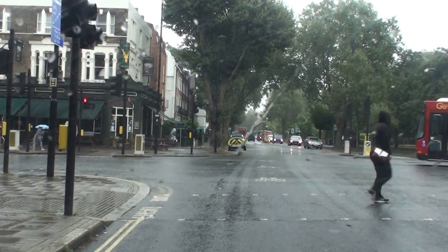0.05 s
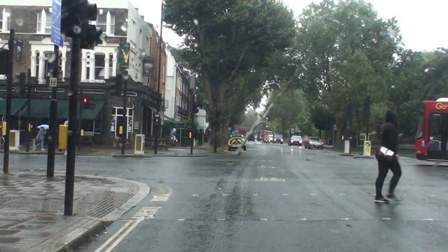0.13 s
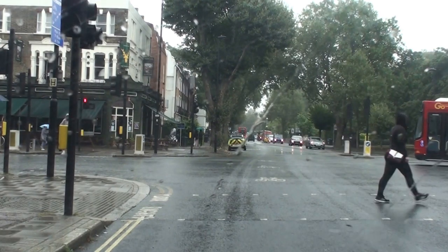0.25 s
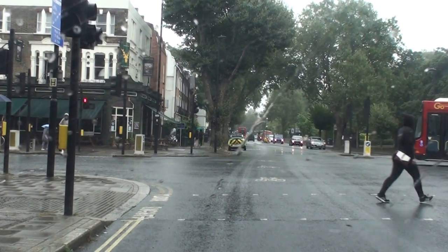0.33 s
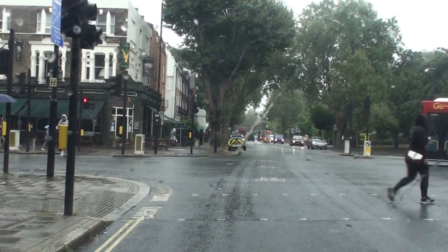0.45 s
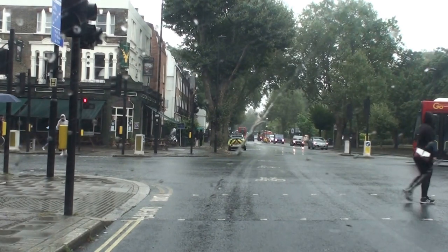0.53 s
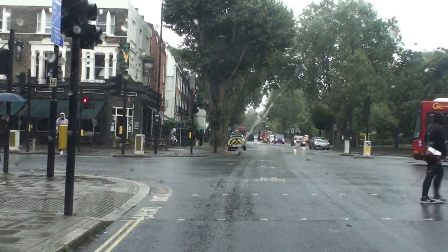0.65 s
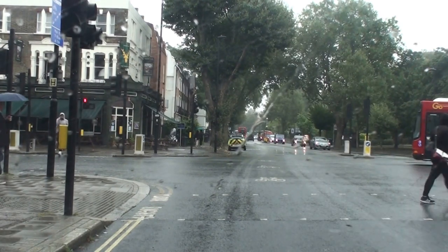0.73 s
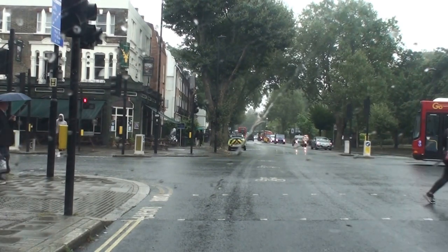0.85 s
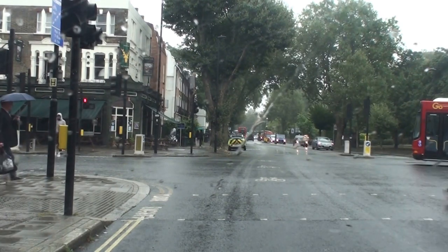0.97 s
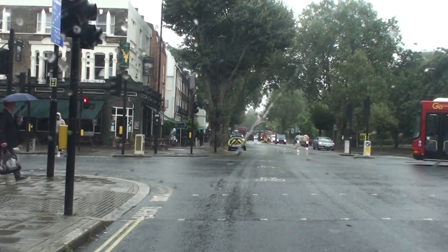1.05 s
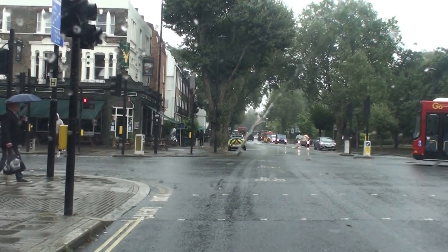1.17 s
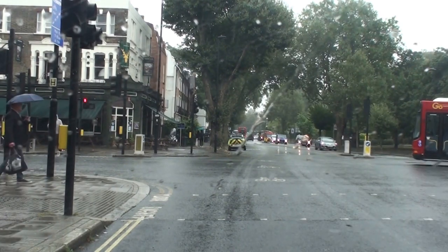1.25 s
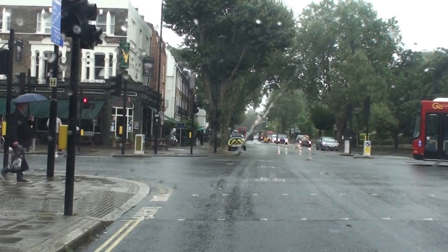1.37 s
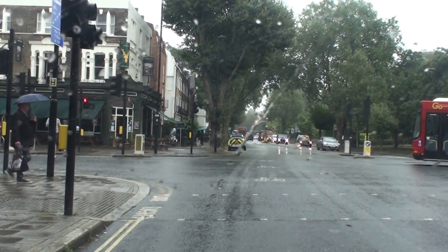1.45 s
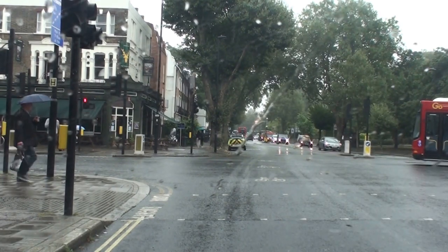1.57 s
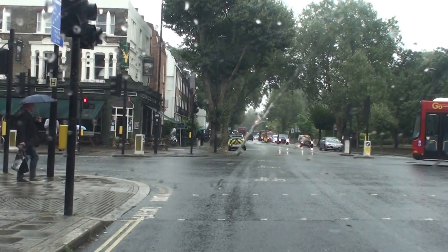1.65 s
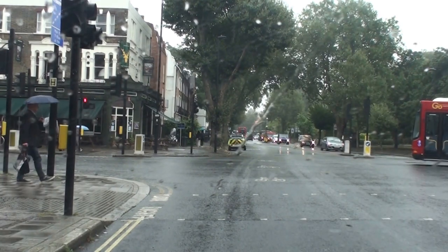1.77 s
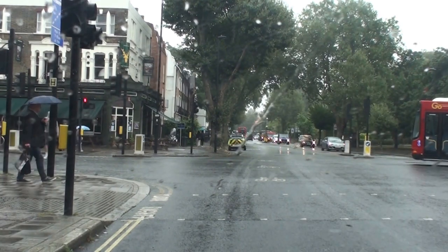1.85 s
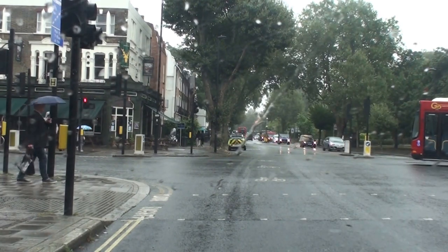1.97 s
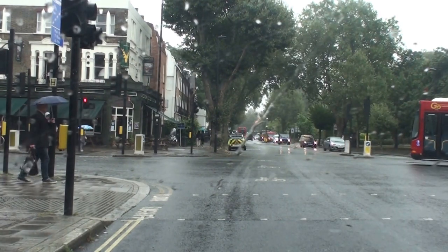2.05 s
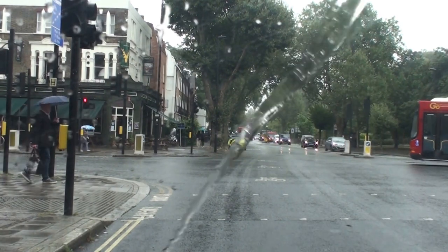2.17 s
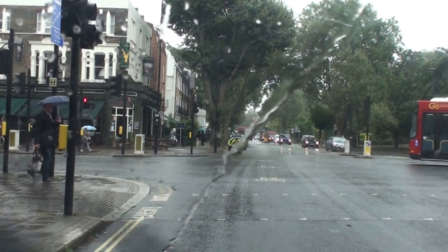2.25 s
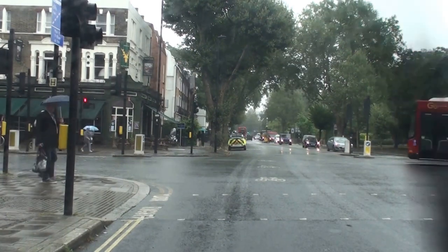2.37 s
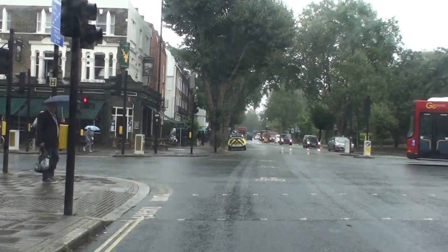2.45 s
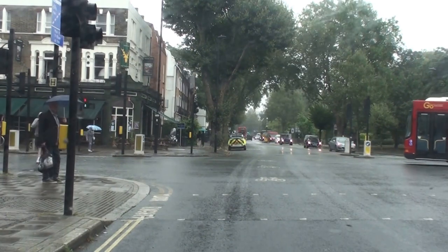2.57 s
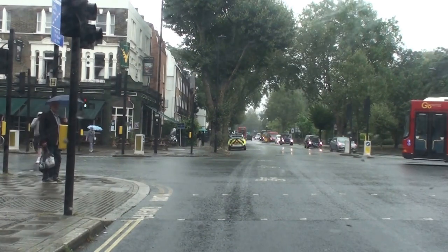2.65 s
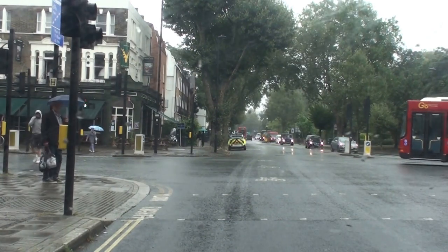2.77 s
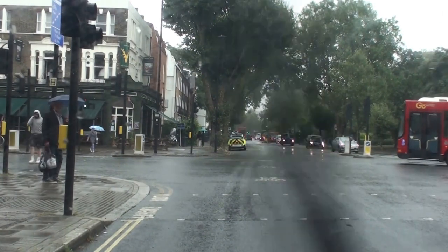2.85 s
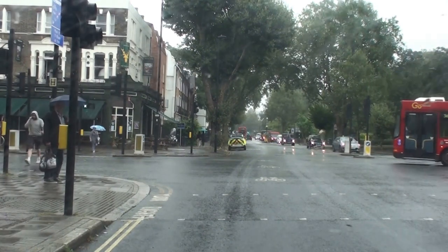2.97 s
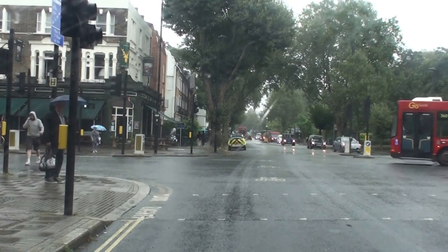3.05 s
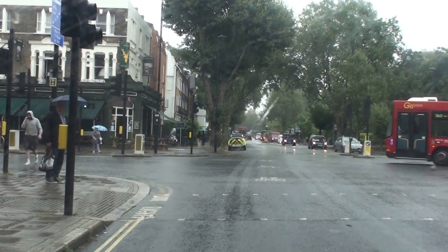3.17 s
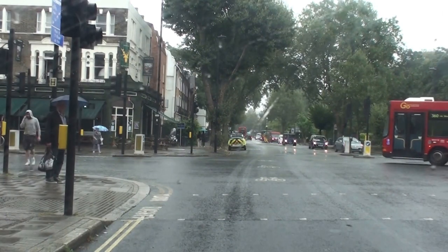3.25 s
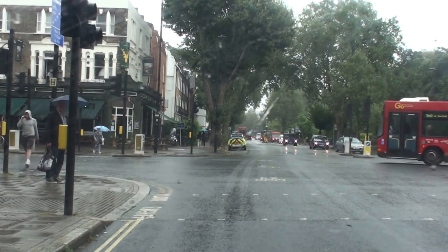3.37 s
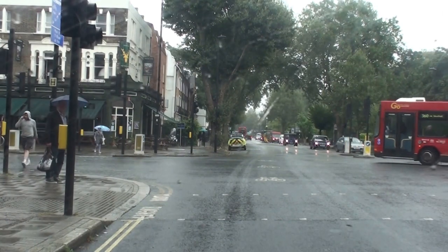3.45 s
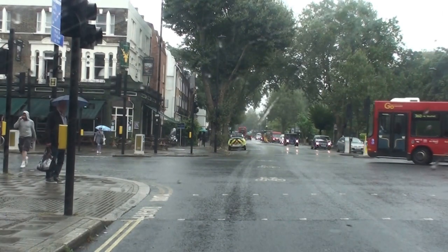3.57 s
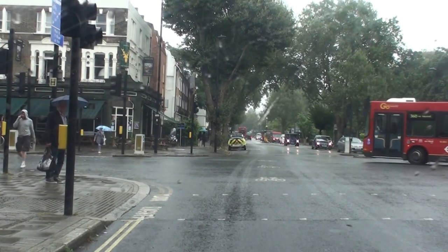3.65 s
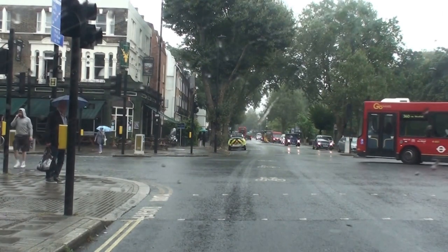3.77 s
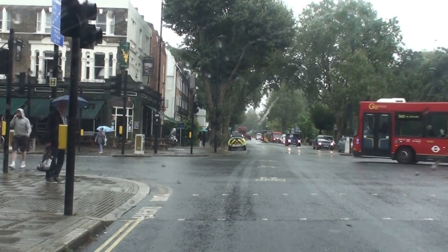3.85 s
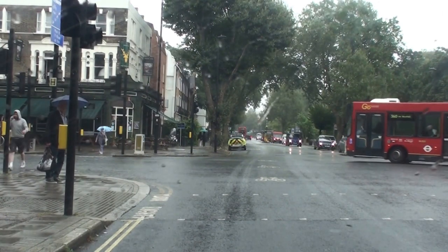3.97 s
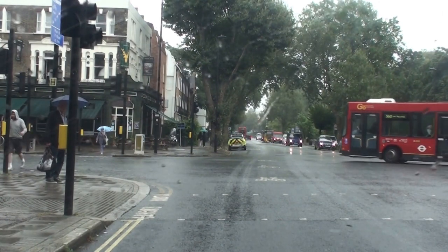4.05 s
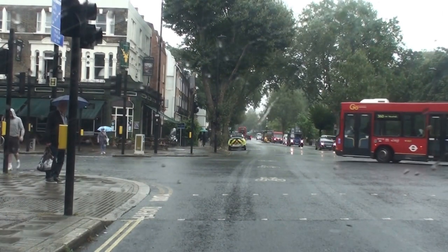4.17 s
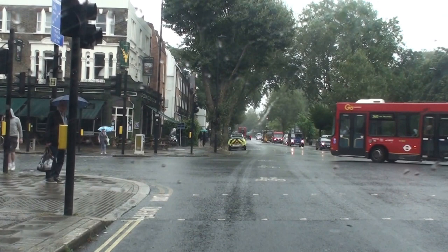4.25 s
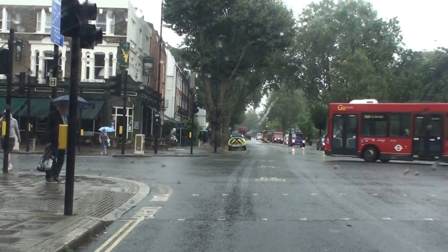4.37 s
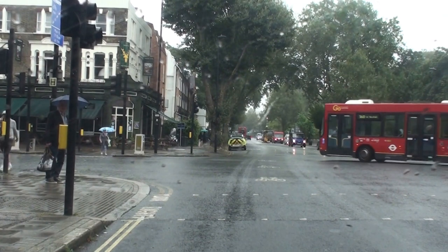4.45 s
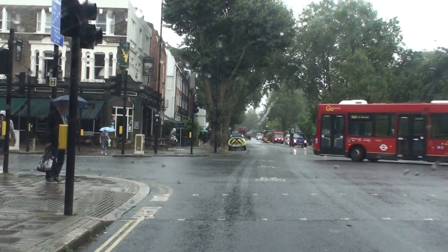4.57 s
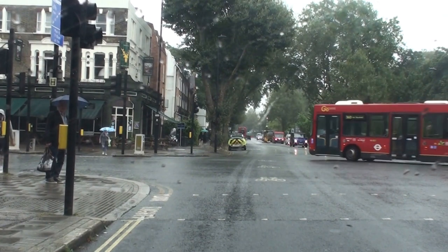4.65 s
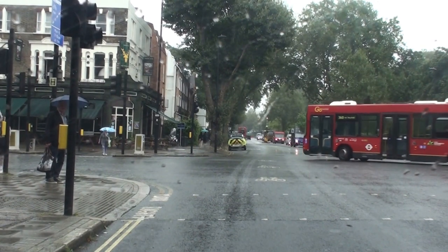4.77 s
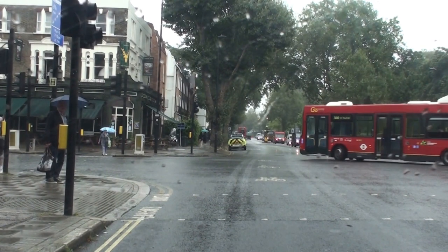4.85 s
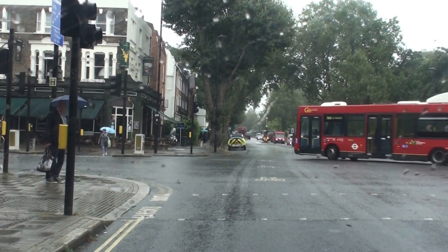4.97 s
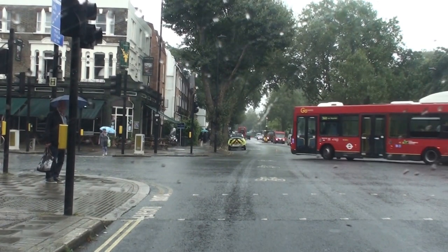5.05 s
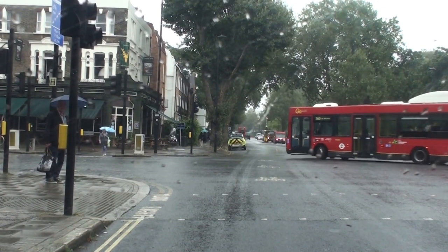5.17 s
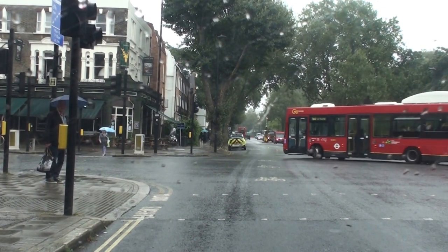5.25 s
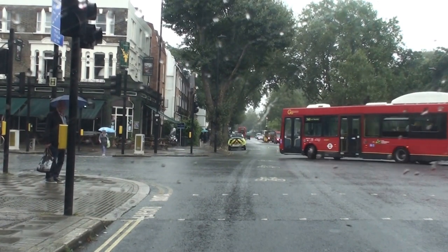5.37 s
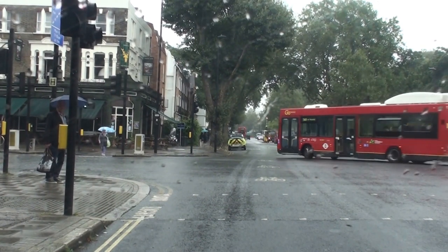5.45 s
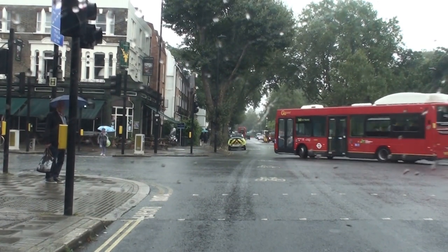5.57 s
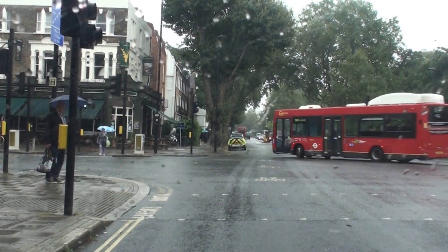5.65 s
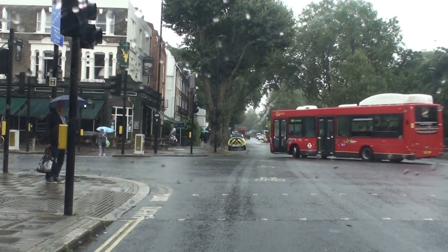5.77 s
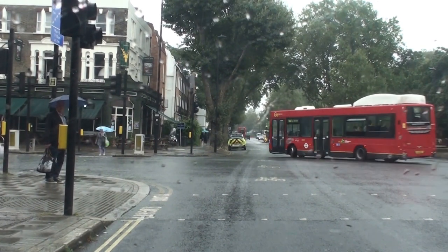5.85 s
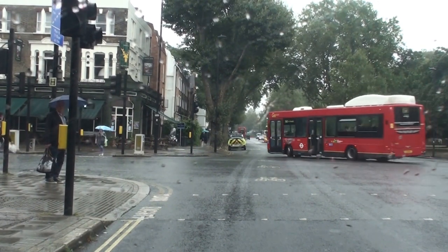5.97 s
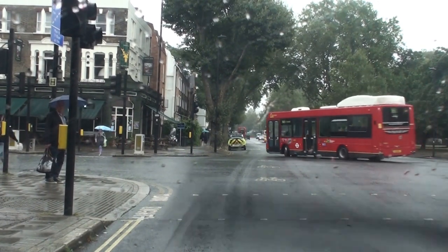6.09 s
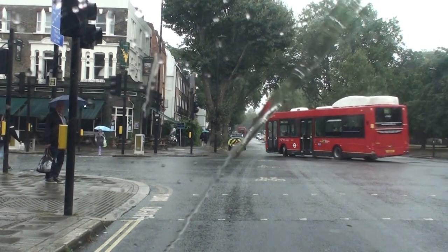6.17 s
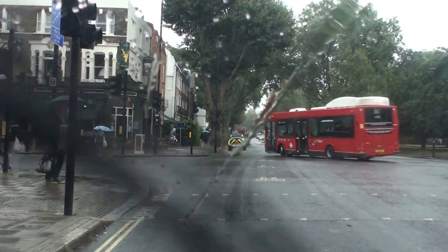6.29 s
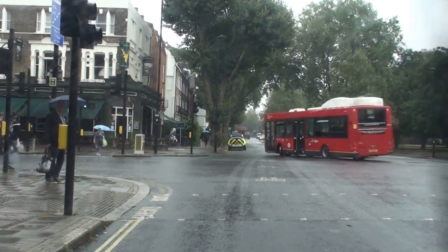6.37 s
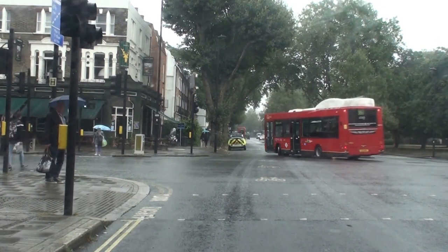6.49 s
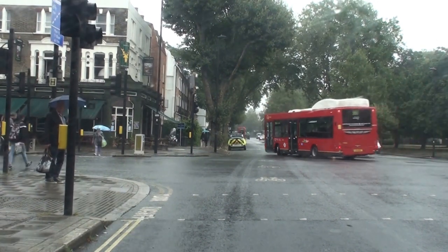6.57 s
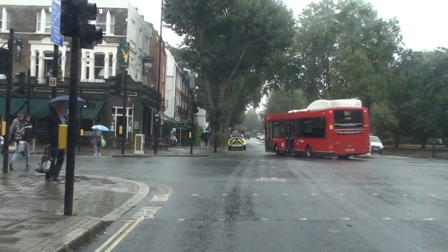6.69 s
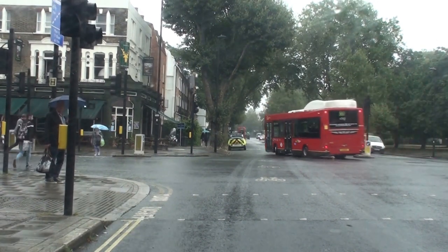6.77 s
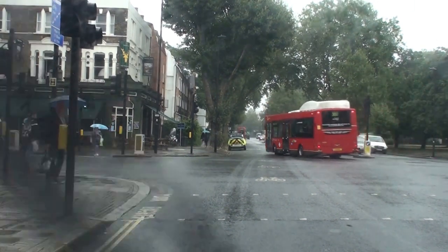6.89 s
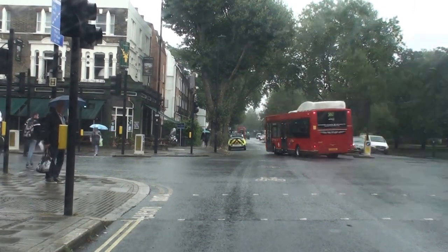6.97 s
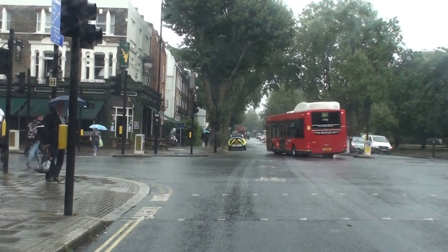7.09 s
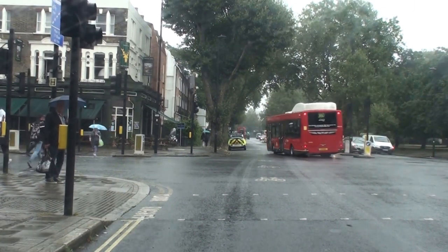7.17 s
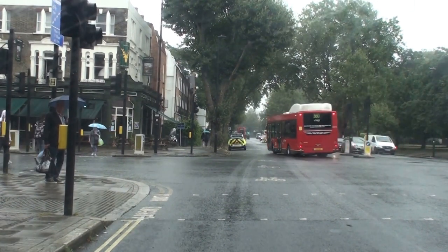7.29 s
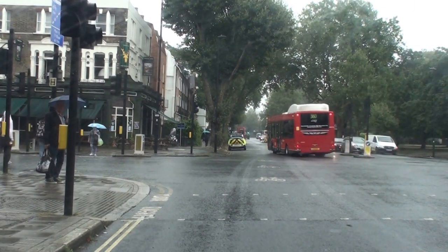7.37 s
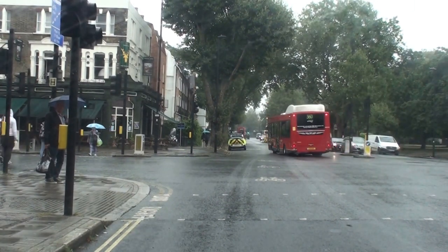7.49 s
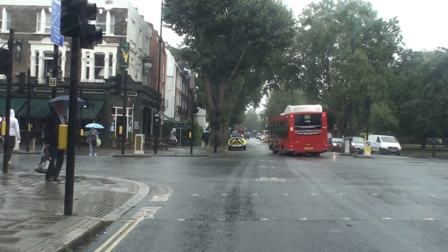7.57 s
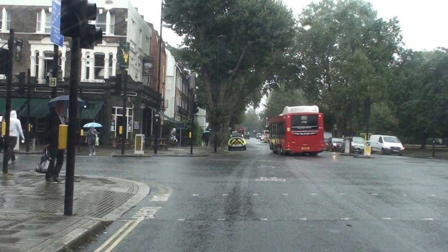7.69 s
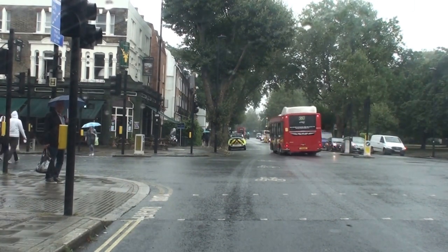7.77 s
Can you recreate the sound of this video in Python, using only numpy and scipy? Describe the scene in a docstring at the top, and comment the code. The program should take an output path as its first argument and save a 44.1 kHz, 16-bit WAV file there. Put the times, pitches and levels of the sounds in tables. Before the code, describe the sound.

Inside a small car waiting in the rain, a low engine idle throbs at about 27 pulses a second, with faint valve ticking, blower hum and soft airflow. From 0.1 s an indicator gives a thin, bright tick, then a duller tock a third of a second later, repeating every 0.68 s to the end. Wet tyres hiss quietly past, strongest around 1 s. A muffled roof drop taps at 1.1 s. At 2.05 s a relay clicks and the wipers start with a heavy thump, motor rumbling; rubber drags upward, then judders and knocks around 2.8-3.2 s, ending near 3.5 s. A drop taps at 3.6 s; a faint far squeal passes around 4 s. More drops fall at 5.7, 6.3 and 6.6 s. The second sweep starts at 6.05 s, its return rougher, with dense clattering from 6.9 to 7.25 s, stopping by 7.5 s. Close, dry cabin sound, wide hiss.

```python
"""A car waits in the rain: engine orders and valve ticks idle under fan hum and noise-band airflow.
From the first moment an indicator relay ticks and tocks; wet tyres hiss past, filtered noise.
Heavy drops tap the roof now and then. At 2 s the wipers sweep up and back, stick-slip pulses and jolts
ringing the screen, the rubber juddering on the drier return. Near 4 s there is a faint far squeal,
and at 6 s a second sweep. The small cabin briefly answers relays, drops and wipers."""
import sys
import numpy as np
from scipy import signal
from scipy.fft import rfft, irfft, next_fast_len
from scipy.io import wavfile
from scipy.ndimage import uniform_filter1d, map_coordinates

SR = 44100
rng = np.random.default_rng(int(sys.argv[2]) if len(sys.argv) > 2 else 0)


def to_wav(s):
    """Save 16-bit WAV."""
    ch = np.atleast_2d(s).T  # columns
    pcm = np.round(np.clip(ch, -1, 1) * 32767)  # PCM
    wavfile.write(sys.argv[1], SR, pcm.astype(np.int16))


N = 345303

# Steady airflow and rumble: centre_hz, relative density_db
CABIN_AIR = [(28, -24), (40, -8), (47, -26), (56, 5.5), (70, -8.5), (110, 0.5), (150, -0.5), (230, -1),
             (275, -7), (330, -9), (420, -7.5), (520, -11), (713, -17), (1450, -26.5), (2200, -41.5),
             (4800, -92)]
# Wet-road hiss: centre_hz, relative density_db
SPRAY = [(880, -6.5), (1500, -6), (1620, 2.5), (2180, -3.5), (3020, -3), (4020, -3.5), (5040, -8),
         (6140, -12), (7040, -14), (15800, -24)]
# Tyres passing outside: time_s, level_db
TYRE_LEVEL = [(0, -59), (.8, -53), (1.2, -52.5), (2, -61.5), (2.8, -58), (4, -63.5), (6, -60.5),
              (7.83, -81)]
# Blower hum: centre_hz, width_hz, level_db (rms)
FAN_HUM = [(301.6, 4.7, -45), (346.6, 11, -45.5)]
# Thin steady tones: pitch_hz, level_db (rms)
WHINES = [(8899, -89), (15622, -87)]
# A faint far squeal, perhaps brakes: time_s, level_db
SQUEAL_LEVEL = [(3.8, -80), (3.9, -63), (4.02, -63), (4.12, -80)]
# Likeness of left and right in the noise beds: centre_hz, correlation
STEREO_LIKENESS = [(60, 0.94), (130, 1), (290, 0.92), (640, 0.79), (1410, 0.24), (3100, 0.53), (6820, 0.24),
                   (15000, 0.77)]
# Engine firing rate: time_s, firing_hz
FIRING_RATE = [(0, 26.92), (.6, 26.92), (1.4, 26.78), (2, 26.79), (2.5, 26.67), (3, 26.76), (3.5, 26.91),
               (4.6, 26.95), (5.5, 26.83), (6, 26.89), (6.5, 26.62), (7, 26.81), (7.83, 26.9)]
# Engine orders: multiple of the firing rate, level_db (rms)
ENGINE_ORDERS = [(1, -39.5), (2, -44.5), (3, -60), (4, -60), (5, -44.5), (6, -55), (7, -75)]
# Valve gear resonances: centre_hz, width_hz, relative gain_db
VALVE_MODES = [(6000, 390, 19), (7000, 500, -1), (4200, 900, -21), (9000, 900, -1)]
# Heavy drops on the roof: start_s, level_db
ROOF_DROPS = [(1.086, -27), (3.63, -18.5), (5.665, -23), (6.337, -31), (6.607, -19.5)]
# Indicator relay closing, then opening: centre_hz, width_hz, relative gain_db
TICK_MODES = [(10900, 130, 3), (11200, 150, -4), (10700, 200, -10), (5900, 900, -11)]
TOCK_MODES = [(5300, 490, 3.5), (5760, 940, -2), (6600, 500, -22), (4300, 620, -3), (9000, 640, -10.5)]
# Wiper relay resonances: centre_hz, width_hz, relative gain_db
SWITCH_MODES = [(2260, 440, -0.5), (3100, 310, 1), (4330, 1260, -0.5), (6400, 2200, -5.5),
                (8800, 550, -6.5), (11500, 1000, -19)]
# Wiper relay clicks: start_s, level_db, treble tilt_db per octave
SWITCH_CLICKS = [(2.057, -29.5, -4.5), (3.3034, -47, 11), (3.4406, -53, 7), (6.047, -31.5, -3),
                 (7.2932, -48, 13)]
# Starts of the wiper sweeps: start_s
SWEEP_STARTS = [2.057, 6.047]
# Load on the wiper motor, alike in every sweep: time_s after the start, gearbox rumble level_db
MOTOR_LOAD = [(-.004, -43), (.004, -19), (.2, -23.5), (.4, -30), (.58, -25.5), (.8, -25.5), (1.0, -27),
              (1.2, -20.5), (1.36, -20.5), (1.43, -43)]
# The rubber grabs and judders: start_s, rise_s, hold_s, drone_db, rub_db, scrape_db
RUBBER_GRABS = [(2.062, 0.032, 0.013, -21, -39, -57), (2.481, 0.01, 0.038, -20.5, -38, -59),
                (2.639, 0.0072, 0.025, -18.5, -57, -73), (2.709, 0.012, 0.013, -17, -35, -69),
                (2.862, .065, 0.009, -10.5, -24.5, -51), (2.926, 0.026, 0.033, -13, -16.5, -31),
                (2.974, 0.026, 0.022, -7.5, -21.5, -33.5), (3.041, 0.025, .01, -28.5, -26, -36),
                (3.069, 0.019, 0.0043, -24, -22, -27), (3.1, 0.0087, 0.007, -33, -36, -39),
                (3.163, 0.011, 0.035, -28, -39, -46.5), (3.239, .015, 0.023, -20.5, -50, -70),
                (3.317, 0.0095, 0.016, -25, -25.5, -73), (3.375, 0.017, 0.017, -24.5, -55, -76),
                (6.047, 0.033, 0.012, -17, -37.5, -53), (6.632, 0.014, 0.0069, -21.5, -54, -70),
                (6.699, 0.021, 0.013, -15.5, -36, -73), (6.84, .065, 0.032, -15, -31.5, -49),
                (6.924, .014, 0.052, -9.5, -16.5, -28.5), (6.989, 0.018, 0.021, -10, -21.5, -26.5),
                (7.04, 0.012, .025, -16.5, -21, -28.5), (7.08, 0.011, 0.029, -19, -19.5, -31),
                (7.139, 0.017, 0.028, -22, -28, -41), (7.188, 0.0098, 0.014, -9, -13.5, -38.5),
                (7.225, 0.011, 0.021, -12.5, -39, -70), (7.31, 0.014, 0.0059, -32, -24, -64)]
# Jolts of blade and linkage: start_s, knock_db, knock_hz, thump_db, crack_db
BLADE_JOLTS = [(2.064, -12, 640, -18, -40), (2.087, 3, 490, 12.5, -27), (2.12, -12, 530, -23, -29),
               (2.188, -30, 460, -12, -34), (2.483, -13, 910, 10.5, -40), (2.506, 8, 530, -12, -34),
               (2.652, -7, 455, 2, -53), (2.726, -11, 465, 0, -45), (2.813, -10, 495, 2, -38),
               (2.881, -20, 525, -8, -33), (2.908, 1, 465, -3, -47), (2.94, 10, 450, -3, -24),
               (2.993, -9, 510, -8, -18), (3.007, -20, 485, -8, -20), (3.064, -10, 550, -12, -30),
               (3.077, -20, 450, -6, -32), (3.088, -9, 1250, -8, -12), (3.112, -11, 900, -18, -41),
               (3.172, -4.5, 590, -4, -27.5), (3.192, -6, 810, -7, -36), (3.246, 2.5, 460, -11, -51),
               (3.333, -2.5, 545, -14, -28), (3.393, -10.5, 670, -26, -44), (6.055, -2, 455, -3, -40),
               (6.082, -5, 490, 4.5, -37), (6.109, -4.5, 460, -16, -27.5), (6.383, -15, 500, -10, -31),
               (6.511, -17, 540, -27, -31.5), (6.644, -12, 450, 5, -55), (6.718, -2.5, 480, -22, -47),
               (6.801, -8.5, 660, -14, -37), (6.913, 7, 460, -19, -45), (6.946, 9.5, 455, 3, -32),
               (6.958, 4, 1000, -8, -14.5), (6.976, 2, 450, 11, -21), (7.016, -9, 450, 14, -15),
               (7.058, 12, 1160, -12, -26), (7.078, 10, 810, -9, -16), (7.091, -2, 920, -1, -13.5),
               (7.113, -1, 760, -30, -14), (7.156, -28, 480, 17, -17), (7.167, -7.5, 715, -18, -12),
               (7.183, -1, 835, -2, -21), (7.197, 1, 905, -2, -20), (7.204, 3, 750, -3, -19),
               (7.244, -4, 485, -16, -46), (7.323, -9, 510, -16, -30), (7.385, -19, 625, -19, -52)]
# Low, middle and high modes of the screen: centre_hz, width_hz, relative gain_db
SCREEN_LOW = [(167, 38.6, -0.5), (226.6, 33.7, 4), (319.6, 74, 1)]
SCREEN_MIDDLE = [(458, 67, 1.5), (654, 57, -2), (834, 220, -4.5), (1197, 152, -3.5), (1420, 520, -6.5)]
SCREEN_HIGH = [(1950, 1130, 0), (2930, 456, 4), (3154, 393, 5), (4430, 960, -3), (5280, 930, -7),
               (8000, 2200, -12.5), (9800, 6000, -14)]
# Bulkhead under the wiper motor: centre_hz, width_hz, relative gain_db
BULKHEAD_MODES = [(79, 114, -4.5), (118.2, 47.4, 2)]
# The soft blade passes little treble: centre_hz, gain_db
RUBBER_DAMPING = [(6000, -2.5), (8500, -5.5), (11500, -27), (15000, -41)]
# Decay of the cabin's answer: centre_hz, t60_s
CABIN_DECAY = [(100, .12), (1000, .05), (8000, .035)]
# Stereo balance of the steady sounds, then of the near ones: centre_hz, left minus right_db
STEADY_BALANCE = [(60, -3), (150, -2.5), (380, 0), (950, 1), (2380, -1), (5980, -1.0), (15000, -0.5)]
NEAR_BALANCE = [(60, -3.5), (150, -2.5), (380, -0.5), (950, 0.0), (2380, -3.0), (5980, -4.0), (15000, -0.5)]

RUMBLE_DB, HISS_DB, HISS_FADE_DB_PER_S = -34, -52.5, 0.21  # the hiss thins slowly
FLASHER_S, CLOSES_S, OPENS_S = .67895, .0967, .4344  # indicator period and first contacts
TICK_DB, BOUNCE_S, BOUNCE_DB = -32, .003, 1  # the closing contact strikes, then bounces once
DRONE_DB, RUB_DB, SCRAPE_DB = -1.5, -23.5, -34.5  # gliding blade, relative to the motor load
SCRAPE_FOLLOWS = 0.14  # the scrape swings less than the load
SLIPS_PER_S = 160  # before random wander
GRAB_RELEASE_S = 0.024
CRACK_HZ, JOLT_T60_S = 2560, 0.029
TOP_HZ = 15790


def amp(db):
    """Decibels to linear gain."""
    return 10 ** (np.asarray(db) / 20)


def unit(x):
    """x scaled to an rms of 1."""
    return x / np.sqrt(np.mean(x ** 2) + 1e-20)


def along(points, hz):
    """(Hz, value) points read on a log frequency axis."""
    f, v = np.transpose(points)
    return np.interp(np.log(hz + 1), np.log(f + 1), v)


def curves(rows, outside=None):
    """One value per sample for each column after the time."""
    s, *cols = np.transpose(rows)
    return [np.interp(np.arange(N) / SR, s, c, outside, outside) for c in cols]


def wobble(rate):
    """A smooth random curve, rate knots a second."""
    knots = rng.standard_normal(int(N * rate / SR) + 4)
    return map_coordinates(knots, [np.arange(N) * rate / SR])


def filtered(x, response):
    """x times a complex response of frequency."""
    m = next_fast_len(N + SR // 2)
    return irfft(rfft(x, m) * response(np.fft.rfftfreq(m, 1 / SR)), m)[..., :N]


def resonant(x, modes):
    """x through causal resonances of alternating sign, scaled so that white noise keeps its rms."""
    def shape(f):
        return sum((-1) ** k * amp(db) * 1j * f * w / (c * c - f * f + 1j * f * w)
                   for k, (c, w, db) in enumerate(modes))
    power = np.mean(abs(shape(np.arange(1, SR // 2, 2.))) ** 2)
    return filtered(x, shape) / np.sqrt(power)


def peaked(x, hz, q):
    """x through one broad resonance."""
    return signal.lfilter(*signal.iirpeak(np.clip(hz, 200, 9000), q, SR), x)


def bursts(times, db, t60, attack=0.00014, alike=0):
    """Noise that starts quickly and dies away; alike is the share that repeats from burst to burst."""
    x, t = np.zeros(N + SR), np.arange(SR // 5) / SR
    habit = alike * rng.standard_normal(len(t))
    for s, level, life in np.broadcast(times, db, t60):
        noise = habit + np.sqrt(1 - alike ** 2) * rng.standard_normal(len(t))
        envelope = amp(level - 60 * t / life) * (1 - np.exp(-t / attack))
        x[round(s * SR):][:len(t)] += envelope * noise
    return x[:N]


def pulses(rate, start=0):
    """Sample indices where the running count of cycles passes a whole number."""
    return np.flatnonzero(np.diff(np.floor(np.cumsum(rate) / SR + start)))


def rush(spectrum, patchy_db):
    """Stereo noise of rms 1 with patches of random gain, partly shared by left and right."""
    z = signal.stft(rng.standard_normal((2, N)), nperseg=512)[2]
    field = uniform_filter1d(rng.standard_normal(z.shape[1:]), 6, 0)
    field = uniform_filter1d(field, 10, 1)
    pair = signal.istft(z * amp(patchy_db * unit(field)), nperseg=512)[1][:, :N]

    def mid_side(hz):
        turn = np.arccos(np.clip(along(STEREO_LIKENESS, hz), -1, 1)) / 2
        return amp(along(spectrum, hz)) * [np.cos(turn), np.sin(turn)]
    mid, side = filtered(pair, mid_side)
    return unit(np.array([mid + side, mid - side]))


def lean(x, balance):
    """Left and right hear each band at their own strength."""
    return filtered(x, lambda hz: amp(np.outer([.5, -.5], along(balance, hz))))


def air():
    """Noise beds for rumble, hiss and passing tyres; narrow resonances hum and squeal, sines whine."""
    t = np.arange(N) / SR
    hum = sum(amp(db) * resonant(rng.standard_normal(N), [(hz, w, 0)]) for hz, w, db in FAN_HUM)
    tones = sum(np.sqrt(2) * amp(db) * np.sin(2 * np.pi * hz * t) for hz, db in WHINES)
    squeal_db, = curves(SQUEAL_LEVEL, -200)
    squeal = amp(squeal_db) * resonant(rng.standard_normal(N), [(3700, 90, 0)])
    flutter_db = .7 * wobble(9)
    rumble = amp(RUMBLE_DB + flutter_db) * rush(CABIN_AIR, patchy_db=0.0)
    hiss = amp(HISS_DB - HISS_FADE_DB_PER_S * t) * rush(SPRAY, patchy_db=1.5)
    tyres_db, = curves(TYRE_LEVEL)
    tyre_bands = [(1500, -29), (2400, -4.0), (3000, 7.0), (3500, 0.5), (4200, -3.5), (6000, -31)]
    tyres = amp(tyres_db) * rush(tyre_bands, patchy_db=-0.1)
    return hum + tones + squeal + rumble + hiss + tyres


def engine():
    """Low orders of the firing rate shake the shell; the valve gear ticks once per firing."""
    rate, = curves(FIRING_RATE)
    turn = 2 * np.pi * (np.cumsum(rate) / SR + .11)
    hum = np.zeros(N)
    for k, db in ENGINE_ORDERS:
        unsteady_db = 0.26 * k * wobble(2.5)  # higher orders are less steady
        hum += np.sqrt(2) * amp(db + unsteady_db) * np.cos(k * turn)
    at = pulses(rate, .02) / SR
    scatter_db = 1.3 * rng.standard_normal(len(at))
    ticks = bursts(at, -54.5 + scatter_db, 0.058, 0.0018, alike=0.61)
    return hum + resonant(ticks, VALVE_MODES)


def drops():
    """Single heavy drops tap the roof; the lining muffles them."""
    s, db = np.transpose(ROOF_DROPS)
    taps = bursts(s, db, .02, .001, alike=.7)
    roof = resonant(taps, [(350, 180, 2), (740, 550, -1.0), (1300, 800, -11.0)])
    return filtered(roof, lambda hz: 1 / (1 + 1j * hz / 1400) ** 3)


def relays():
    """Contact strikes and noise bursts ring the indicator relay in a steady beat; wiper relay clicks join."""
    beat = np.arange(int(N / SR / FLASHER_S) + 1) * FLASHER_S
    strikes = np.zeros(N)
    strikes[((beat + CLOSES_S) * SR).astype(int)] = amp(TICK_DB)
    strikes[((beat + CLOSES_S + BOUNCE_S) * SR).astype(int)] = amp(TICK_DB + BOUNCE_DB)
    tick = resonant(strikes, TICK_MODES)
    tock = resonant(bursts(beat[:-1] + OPENS_S, -43.5, 0.042, alike=0.41), TOCK_MODES)
    switch = np.zeros(N)
    for s, db, tilt in SWITCH_CLICKS:
        tilted = [(hz, w, g + tilt * np.log2(hz / 4000)) for hz, w, g in SWITCH_MODES]
        switch += resonant(bursts(s, db, 0.049), tilted)
    return filtered(tick + tock, lambda hz: 1 / (1 + (hz / 12000) ** 12)) + switch


def effort():
    """Gains of drone, rub, scrape and rumble: the motor's load through each sweep, grabs on top of the first three."""
    t = np.arange(N) / SR
    since, db = np.transpose(MOTOR_LOAD)
    load_db = np.max([np.interp(t - s, since, db, -200, -200) for s in SWEEP_STARTS], axis=0)
    scrape_db = np.where(load_db > -200, db.max() + SCRAPE_FOLLOWS * (load_db - db.max()), -200)
    gains = amp([load_db + DRONE_DB, load_db + RUB_DB, scrape_db + SCRAPE_DB])
    for s, rise, hold, *levels_db in RUBBER_GRABS:
        corners = np.cumsum([0, rise, hold, GRAB_RELEASE_S])
        shape = np.interp(t - s, corners, [0, 1, 1, 0]) ** 2
        gains = gains + amp(levels_db)[:, None] * shape
    return *gains, amp(load_db)


def jolts():
    """Each jolt is a few quick blows on the screen and a short crack."""
    thump, knock, crack = np.zeros((3, N))
    t = np.arange(SR // 12) / SR
    fade = amp(-60 * t / JOLT_T60_S) * (1 - np.exp(-t / 0.00064))
    for s, knock_db, knock_hz, thump_db, crack_db in BLADE_JOLTS:
        span = slice(round(s * SR), round(s * SR) + len(t))
        blows = np.zeros(len(t))
        blow_s = np.array([0, .004, .009]) * rng.uniform(.8, 1.2)
        blows[(SR * blow_s).astype(int)] = [1, -.5, .25]  # the blade rebounds
        thump[span] += amp(thump_db) * blows
        rough = blows + 0.32 * fade * rng.standard_normal(len(t))
        knock[span] += amp(knock_db) * peaked(rough, knock_hz, 1.82)
        crack[span] += amp(crack_db) * fade * peaked(rng.standard_normal(len(t)), CRACK_HZ, 1.6)
    return thump, knock, crack


def squeaks(at, centre_hz, spread, cycles):
    """A short damped tone at each slip; its pitch drifts as the contact moves along the blade."""
    draw = rng.standard_normal((len(at), 2))
    hz = centre_hz * np.exp(spread * (wobble(30)[at] + 0.56 * draw[:, 0]))[:, None]
    t = np.arange(SR // 60) / SR
    envelope = amp(4.6 * draw[:, 1:] - 60 * t * hz / cycles)
    tone = envelope * np.sin(2 * np.pi * np.minimum(hz, 12000) * t)
    places = at[:, None] + np.arange(len(t))
    return unit(np.bincount(places.ravel(), tone.ravel(), N)[:N])


def wipers():
    """The rubber sticks and slips; slips and jolts ring the low, middle and high modes of the screen."""
    drone, rub, scrape, rumble = effort()
    at = pulses(SLIPS_PER_S * amp(1.5 * wobble(60)))
    slips = np.zeros(N)
    slips[at] = amp(2 * rng.standard_normal(len(at)))
    decay = amp(-60 * np.arange(SR // 50) / SR / 0.027)
    chatter = signal.fftconvolve(slips, decay)[:N]
    grit = unit(chatter * rng.standard_normal(N))  # hisses just after each slip
    push = unit(slips) + 0.99 * rng.standard_normal(N)
    thump, knock, crack = jolts()
    low = resonant(drone * unit(push) + thump, SCREEN_LOW)
    low += resonant(rumble * rng.standard_normal(N) + 0.58 * thump, BULKHEAD_MODES)
    middle = resonant(rub * unit(push + 1.1 * grit) + knock, SCREEN_MIDDLE)
    middle += 0.71 * rub * squeaks(at, 930, 0.39, 31)
    # Heavy modes answer only slow forces
    corner_hz = np.array([[500], [1800]])
    low, middle = filtered(np.array([low, middle]), lambda hz: 1 / (1 + 1j * hz / corner_hz) ** 2)
    high = resonant(.85 * scrape * grit + crack, SCREEN_HIGH)
    high += .4 * scrape * squeaks(at, 3000, .3, 35)
    return filtered(low + middle + high,
                    lambda hz: amp(along(RUBBER_DAMPING, hz)) * (1j * hz / (60 + 1j * hz)) ** 2)


def cabin(x):
    """Stereo noise tails, each frequency dying at its own speed, are redrawn twenty times a second."""
    hop = SR // 40
    wet, fade = np.zeros((2, N + SR)), signal.windows.hann(2 * hop, sym=False)
    for k in range(0, N - 2 * hop, hop):
        if k % (2 * hop) == 0:
            hz, t, z = signal.stft(rng.standard_normal((2, SR // 8)), SR, nperseg=128)
            decay = amp(-60 * t / along(CABIN_DECAY, hz)[:, None])
            tail = signal.istft(z * decay, SR, nperseg=128)[1]
        piece = (x[k:k + 2 * hop] * fade)[None]
        answer = signal.fftconvolve(piece, tail / np.linalg.norm(tail[0]), axes=1)
        wet[:, k:k + answer.shape[1]] += answer
    return filtered(wet[:, :N], lambda hz: amp(along([(330, -15.0), (480, -6), (8000, -1)], hz)))


def scene():
    """Steady sounds and near events, each group with its own stereo balance."""
    steady = air() + engine()
    near = drops() + relays() + wipers()
    return lean(steady, STEADY_BALANCE) + lean(0.94 * near + cabin(near), NEAR_BALANCE)


def record(dry):
    """A soft limit rounds off the highest peaks; nothing is kept outside the band limits."""
    soft = dry / (1 + abs(dry / .95) ** 4) ** (1 / 4)
    return filtered(soft, lambda hz: (hz < TOP_HZ) * (hz > 15))


dry = scene()
out = record(dry)
to_wav(out)
```